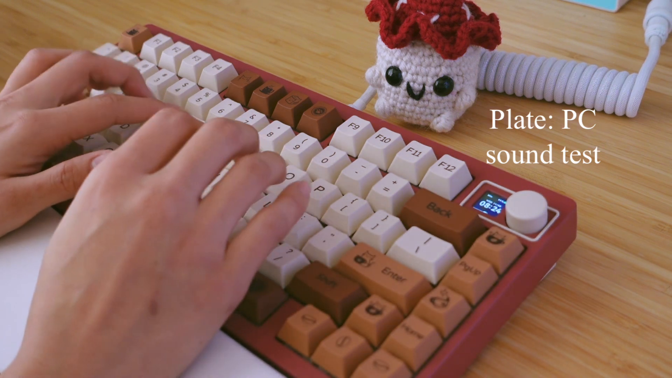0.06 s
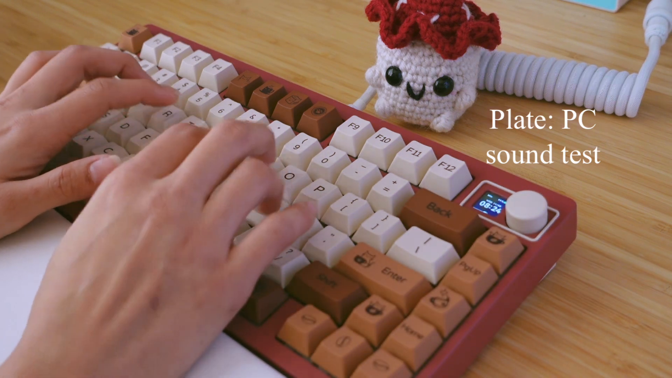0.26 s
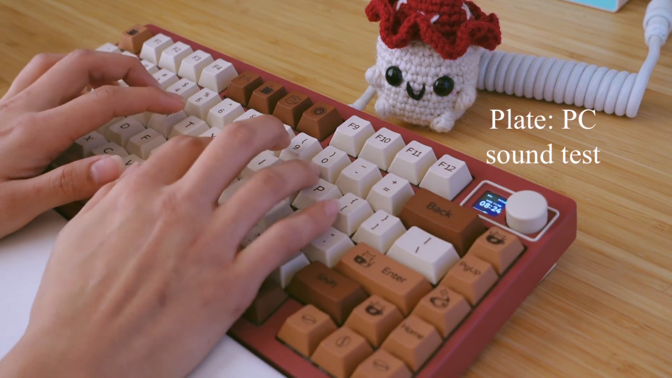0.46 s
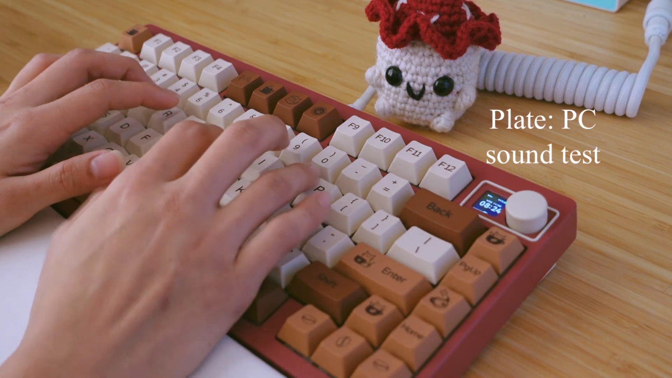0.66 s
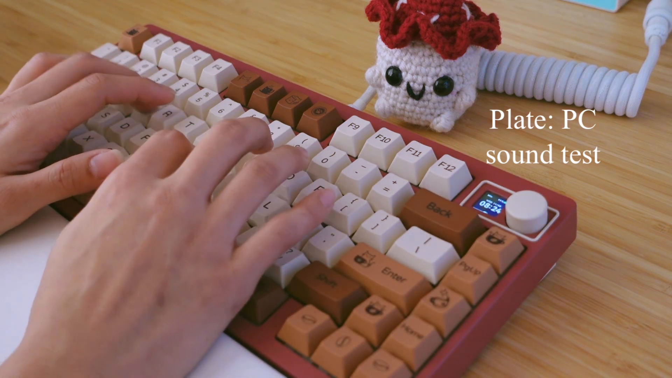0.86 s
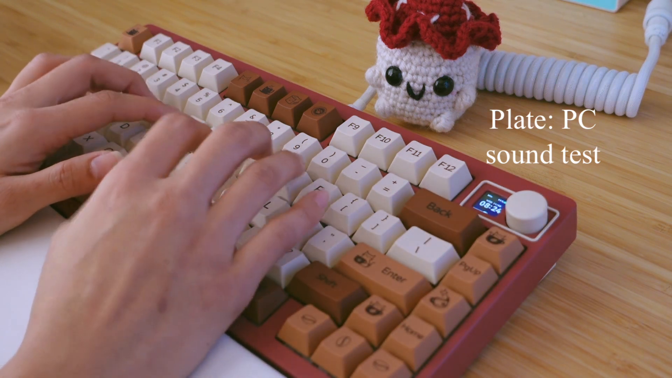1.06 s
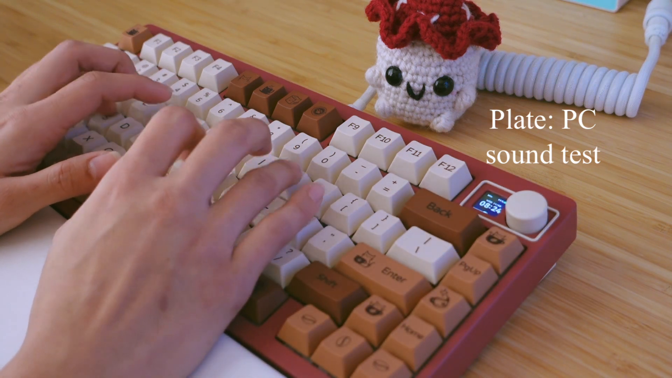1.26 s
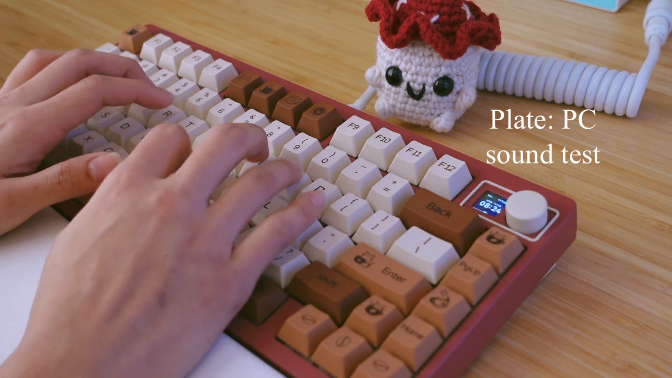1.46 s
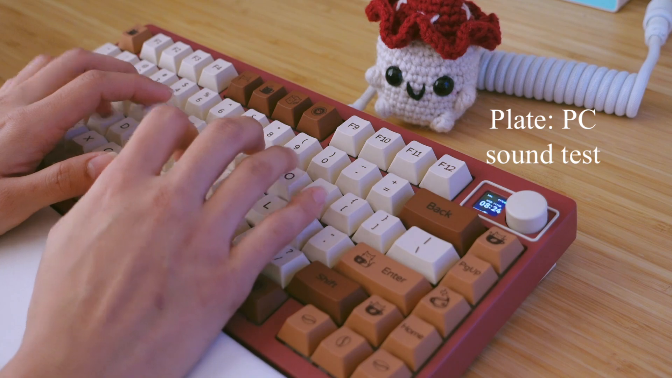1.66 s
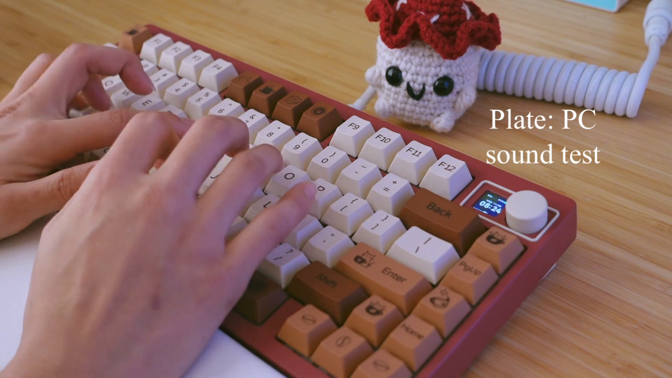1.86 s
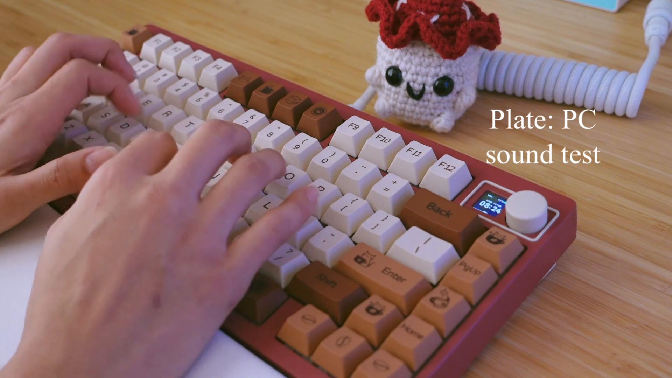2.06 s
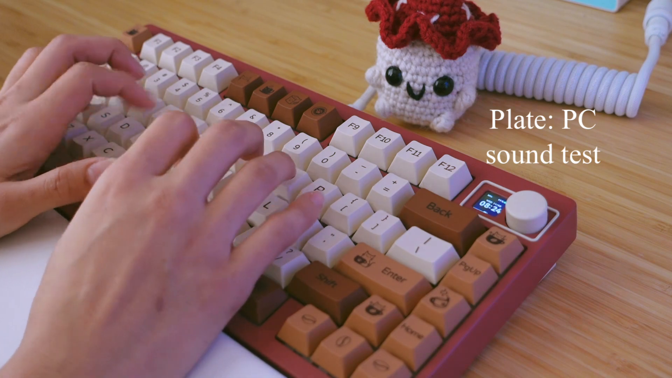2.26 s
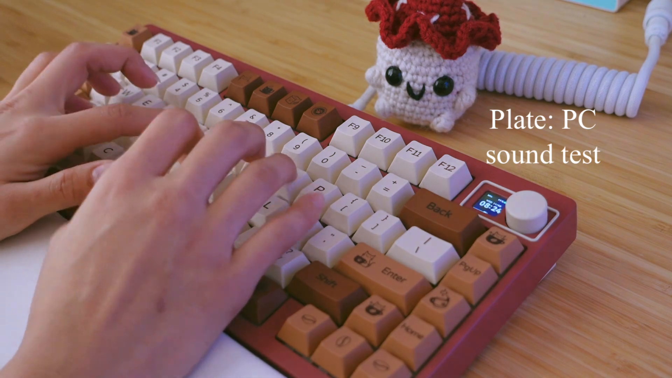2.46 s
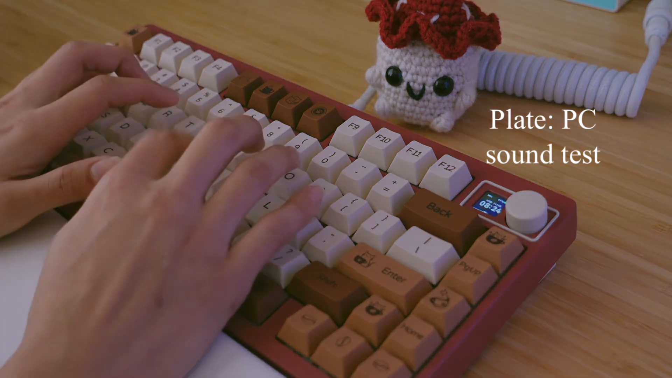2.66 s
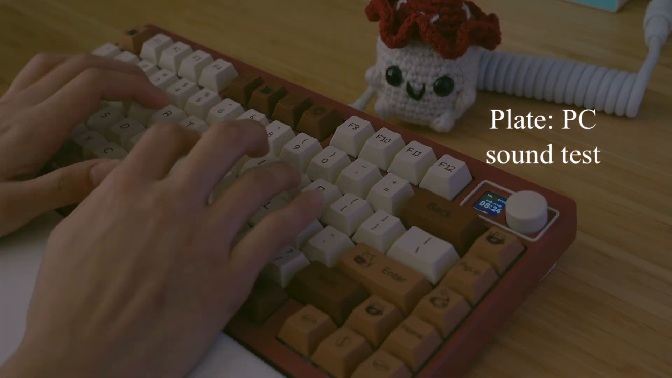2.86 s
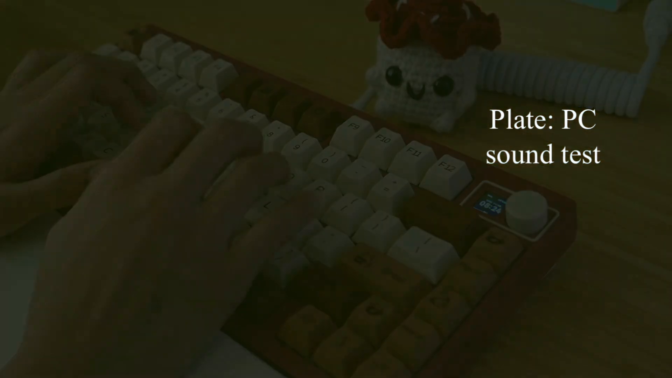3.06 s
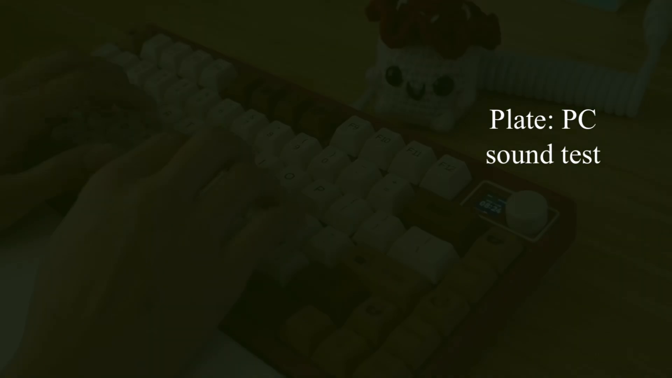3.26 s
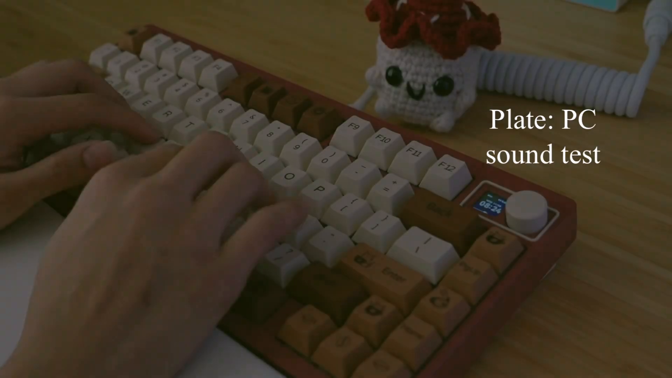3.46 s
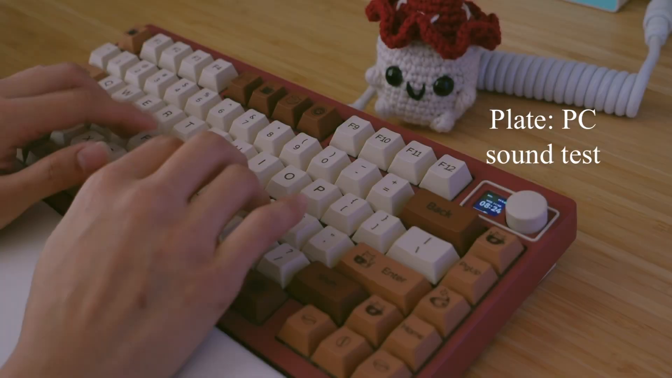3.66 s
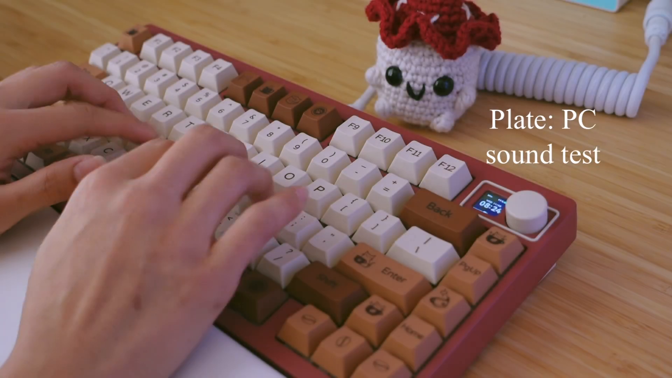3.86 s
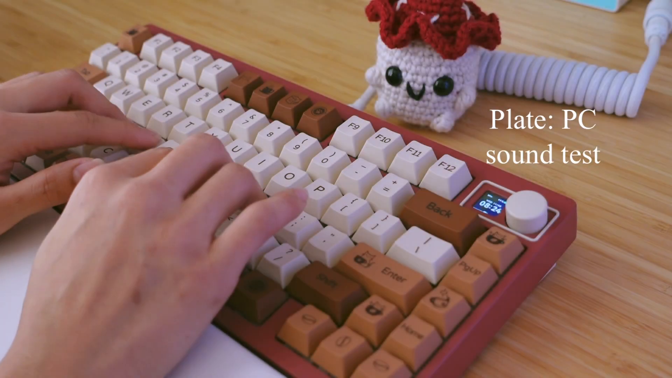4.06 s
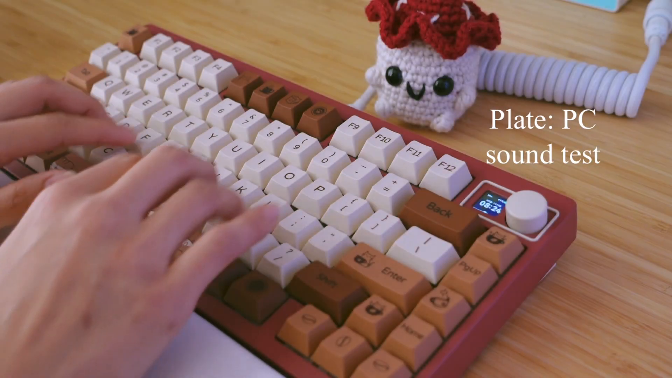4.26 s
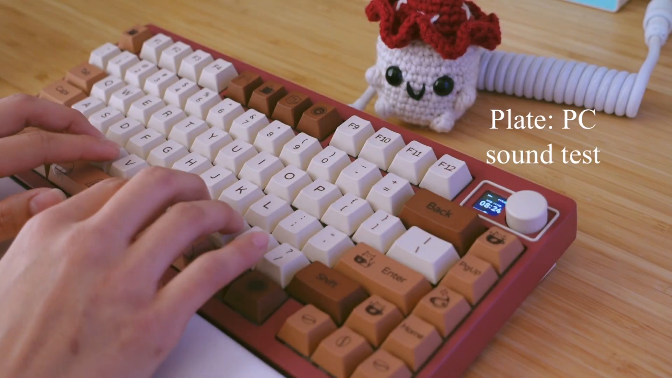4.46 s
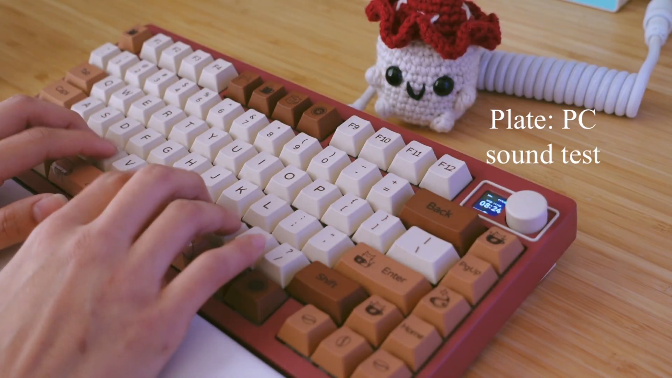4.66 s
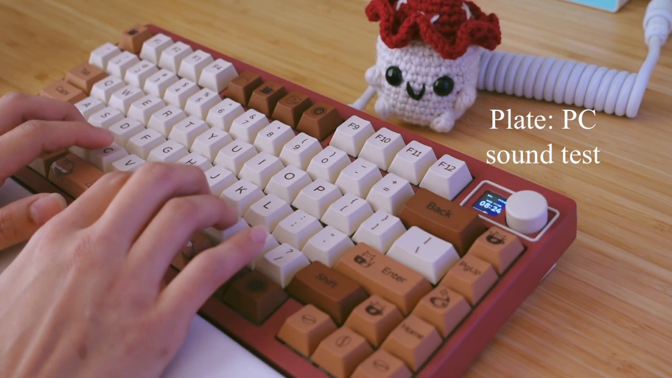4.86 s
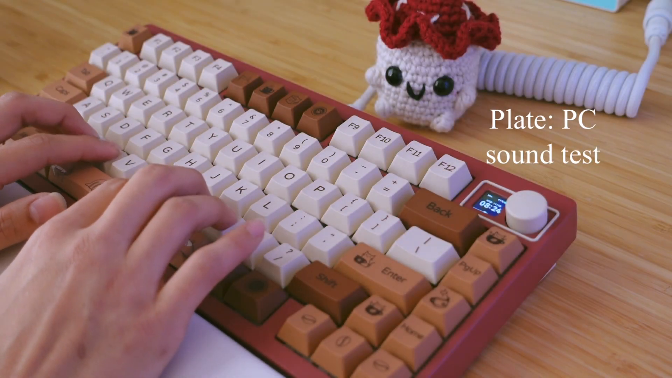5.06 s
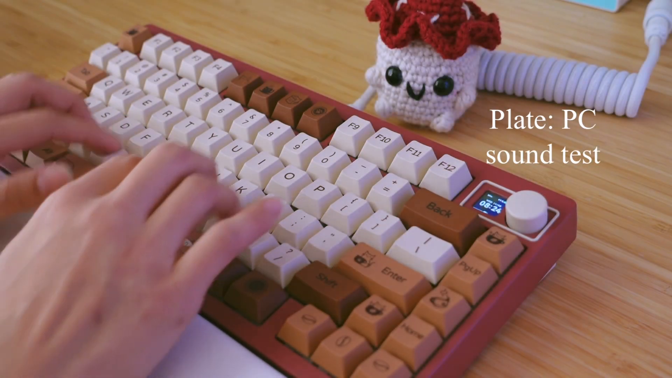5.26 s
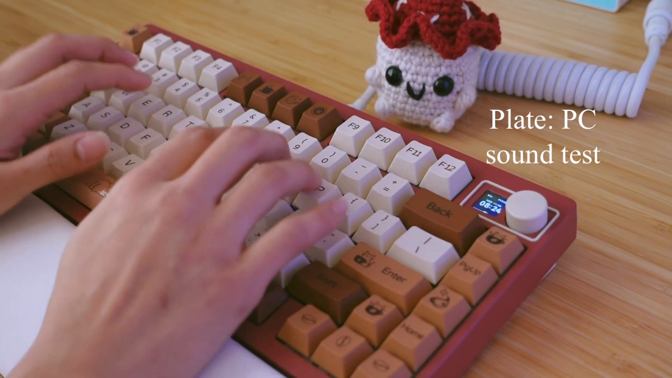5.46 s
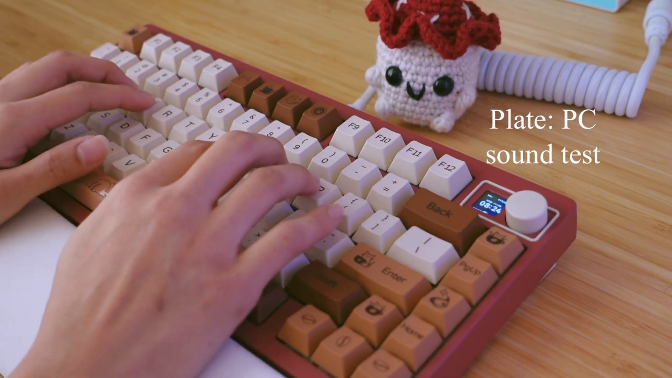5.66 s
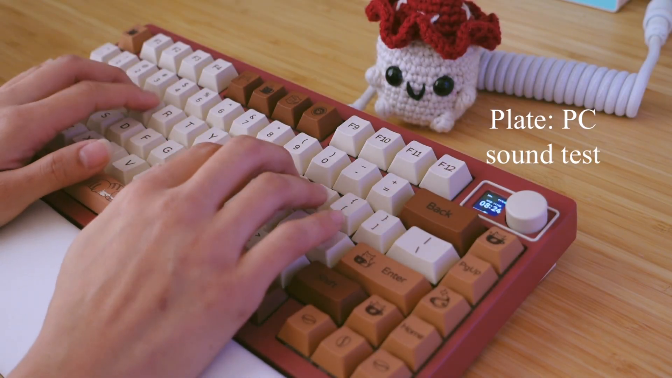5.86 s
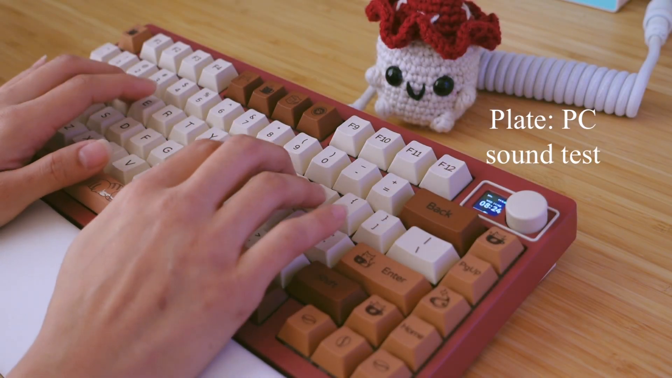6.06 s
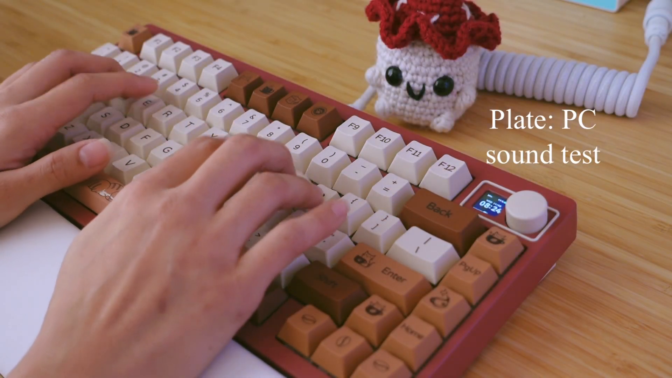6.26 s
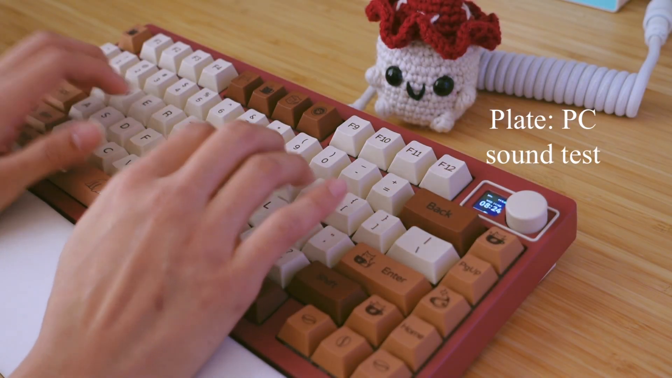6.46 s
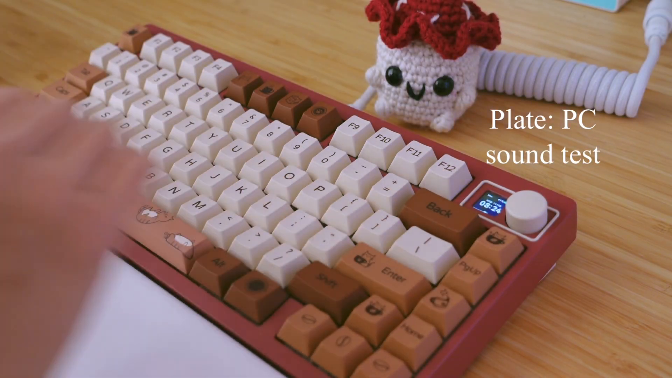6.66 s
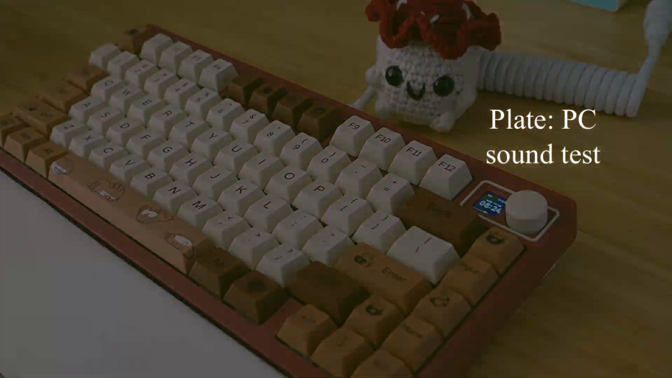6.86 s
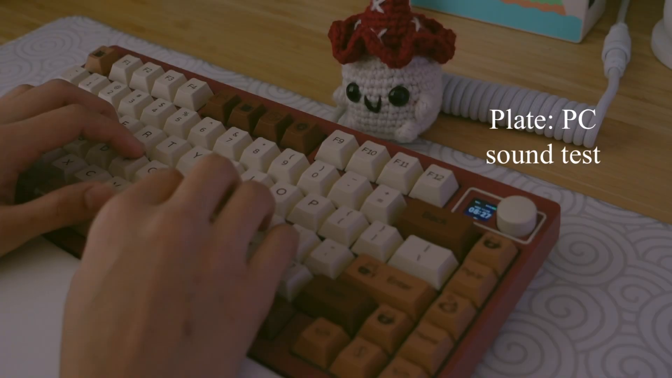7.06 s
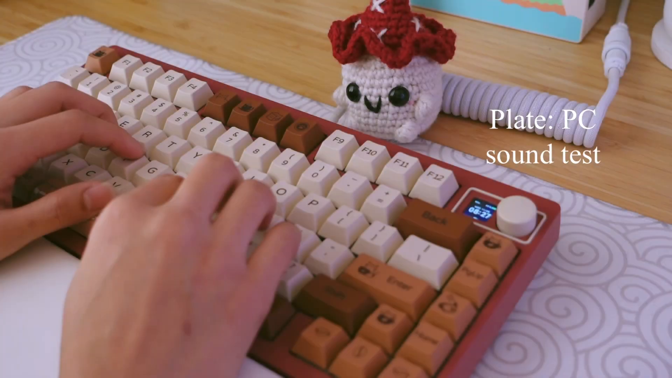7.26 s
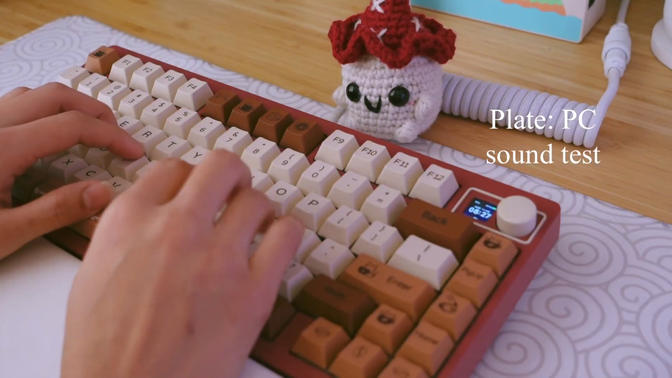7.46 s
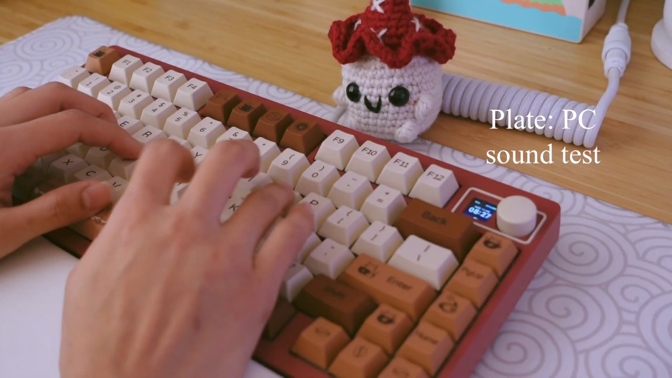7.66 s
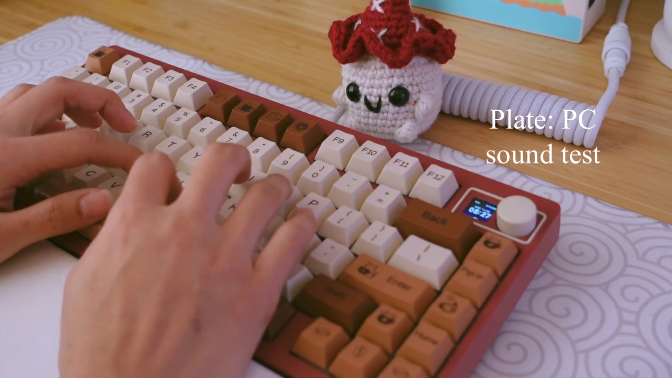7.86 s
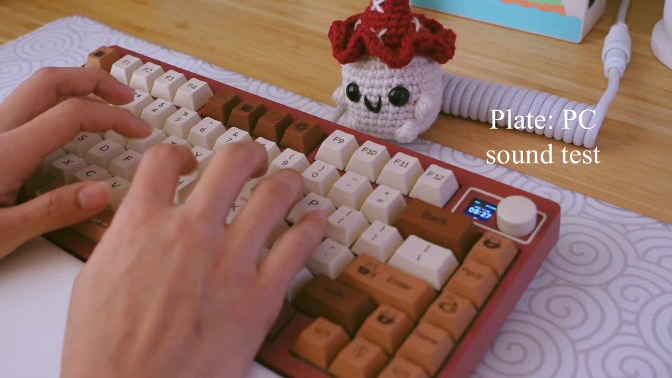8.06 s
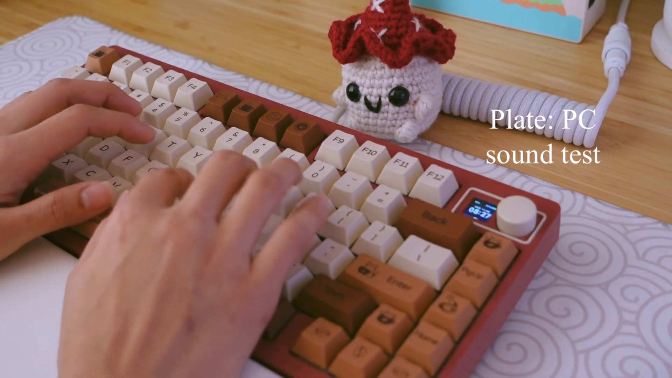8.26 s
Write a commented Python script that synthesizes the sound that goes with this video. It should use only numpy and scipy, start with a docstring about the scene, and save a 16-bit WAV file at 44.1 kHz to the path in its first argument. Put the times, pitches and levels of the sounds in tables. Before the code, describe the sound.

A mechanical keyboard is typed on quickly, heard close up on a wooden desk in a small, fairly dry room. Soft fan air and a thin high whine run from the start. From 0 to 2.9 s firm, bright plastic clacks come about ten or more a second, with a lull around 0.3-0.7 s, crisp switch snaps, short case ringing, low desk thumps and a few hollow strokes. After a short gap, lighter, denser clatter runs from 3.4 to 4.2 s with a springy high zing. Another tight burst, with more knock from the plate, fills 4.7-5.3 s. A strong, rapid flurry follows at 5.8-6.5 s, then faint finger brushes and a pause. Near 7 s the fan and whine drop. From 7.5 to 8.3 s steadier, sparser strokes clack on a soft mat, with much less thump and a clear spring zing.

```python
"""Runs of quick typing on a mechanical keyboard with a plastic plate, a microphone close by on the wooden desk.
A soft fan and a faint whine are there from the start; the whine weakens and the fan sinks late on.
Each press and release clacks a keycap, knocks the plate, shakes the case, snaps the switch and thumps the desk.
A small room answers the clacks, fingertips brush the caps, some strokes land hollow; the last run is on a soft mat.
Struck parts are damped modes and shaped noise; fan, whine and brushes are filtered noise."""
import sys
import numpy as np
from scipy import signal
from scipy.fft import rfft, irfft, next_fast_len
from scipy.io import wavfile

SR = 44100
rng = np.random.default_rng(int(sys.argv[2]) if len(sys.argv) > 2 else 0)


def dump(signal):
    """Clip the signal to [-1, 1] and save it as 16-bit WAV at the path in sys.argv[1]."""
    limited = np.clip(np.atleast_2d(signal).T, -1, 1)
    pcm = np.round(limited * 32767).astype(np.int16)
    wavfile.write(sys.argv[1], SR, pcm)


N = 366910
T = np.arange(SR // 6) / SR  # time within one stroke, s

# Runs of typing, the last on a soft mat. Each row: start in seconds, end in seconds, lift of the snap in dB,
# lift of the thump in dB, spring zing against the snap in dB, plate tuning as a ratio.
RUNS = [(.05, 2.93, 2.5, 1.5, -10.5, 1.05), (3.359, 4.28, -1, 0.5, 1, 0.96), (4.67, 5.33, -2, -3, -8, 0.95),
        (5.831, 6.5, 0.5, 1, -13, 0.996), (7.5, 8.3, 0.5, -10, -1, 0.93)]


def amp(db):
    """Decibels to gain."""
    return 10 ** (np.asarray(db) / 20)


def unit(x):
    """Scale to rms 1."""
    return x / np.sqrt(np.mean(x ** 2) + 1e-20)


def over(x, span):
    """Scale a short sound so that its energy, spread over span seconds, has rms 1."""
    return x * np.sqrt(span * SR / (np.sum(x ** 2) + 1e-20))


def along(points, hz):
    """Read (Hz, value) points on a log frequency axis."""
    f, v = np.transpose(points)
    return np.interp(np.log(hz + 1), np.log(f + 1), v)


def filtered(x, response):
    """Multiply the spectrum of x by a response of frequency."""
    n = x.shape[-1]
    padded = next_fast_len(n + 4096)
    spectrum = rfft(x, padded) * response(np.fft.rfftfreq(padded, 1 / SR))
    return irfft(spectrum, padded)[..., :n]


def noise(spectrum, shape):
    """Noise coloured by (Hz, dB) points."""
    return filtered(rng.standard_normal(shape), lambda hz: amp(along(spectrum, hz)))


def resonance(centre_hz, width_hz):
    """Noise through one resonance, as long as the whole scene."""
    return filtered(rng.standard_normal(N), lambda hz: bump(hz, centre_hz, width_hz))


def bump(hz, centre, width):
    """Gain of one resonance: 1 at its centre, half at one width to either side."""
    return 1 / (1 + ((hz - centre) / width) ** 2)


def highpass(x, corner_hz, order):
    """Weaken what lies below a corner frequency."""
    return signal.sosfilt(signal.butter(order, corner_hz, "highpass", fs=SR, output="sos"), x)


def wobble(t, rate):
    """A random curve over times t, rate knots a second."""
    knots = rng.standard_normal(int(rate * t[-1]) + 2)
    return np.interp(t * rate, np.arange(len(knots)), knots)


def clatter(spread_db, rate):
    """Uneven strength of loose parts chattering, rate random levels a second."""
    return amp(spread_db * wobble(T, rate))


def fade(attack, t60):
    """Envelope of a struck thing: a rise, then a decay of 60 dB in t60 seconds."""
    return (1 - np.exp(-T / attack)) * amp(-60 * T / t60)


def ring(modes, pitch, attack, scatter_db):
    """Damped modes, struck at new random strengths each time."""
    total = np.zeros(len(T))
    for f, db, t60 in modes:
        strength = amp(db + scatter_db * rng.normal())
        total += strength * np.sin(2 * np.pi * f * pitch * T) * fade(attack, t60)
    return total


def pan(db):
    """Left and right gains for a level difference, positive to the left."""
    return amp(np.array([[.5], [-.5]]) * db)


def add(track, s, sound):
    """Mix a sound into a track at time s."""
    part = track[..., max(0, round(s * SR)):][..., :len(T)]
    part += sound[..., :part.shape[-1]]


def run_at(s):
    """Snap lift, thump lift, zing and plate tuning of the run of typing around or nearest to time s."""
    return min(RUNS, key=lambda run: max(run[0] - s, s - run[1]))[2:]


def fan():
    """Soft moving air with a few narrow resonances, wavering in level together."""
    # Fan and room air. Each row: frequency in Hz, relative level in dB per Hz.
    air_spectrum = [(20, -46), (45, -45), (75, -11), (98, -17), (120, -2), (170, -1.5), (250, -1),
                    (370, -7.5), (520, -7.5), (900, -13.5), (1800, -15.5), (3200, -25), (5500, -34),
                    (16000, -44)]
    # Left-right likeness of the air. Each row: frequency in Hz, coherence from 0 to 1.
    alike = [(60, 0.93), (180, 0.96), (550, 0.78), (1650, 0.66), (4970, 0.56), (15000, 0.79)]
    # Narrow resonances. Each row: frequency in Hz, width in Hz, rms in dB before the slow level changes.
    resonances = [(215.6, 11.9, -48.5), (314.4, 11.8, -54.5), (431, 12.5, -63.5), (993, 2.8, -71.5)]
    # The background sinks a little toward the end. Each row: time in seconds, gain in dB.
    slow_level = [(6.3, 0.52), (7.0, -0.86)]

    def mid_side_gains(hz):
        angle = np.arccos(np.clip(along(alike, hz), -1, 1)) / 2
        return np.array([np.cos(angle), np.sin(angle)])

    mid, side = filtered(noise(air_spectrum, (2, N)), mid_side_gains)
    air = amp(-48) * unit(np.array([mid + side, mid - side]))
    hum = sum(amp(db) * unit(resonance(f, width)) for f, width, db in resonances)
    t = np.arange(N) / SR
    waver_db = 1.4 * wobble(t, rate=14)
    return amp(np.interp(t, *np.transpose(slow_level)) + waver_db) * (air + hum)


def whine():
    """A thin, fuzzy electrical whine: narrow noise that weakens late on."""
    # Steady before the first row and after the last. Each row: time in seconds, rms level in dB.
    whine_level = [(6.8, -72.5), (7.1, -80)]
    level_db = np.interp(np.arange(N) / SR, *np.transpose(whine_level))
    return amp(level_db) * unit(resonance(4370, 83))


def keys():
    """Every contact clacks the cap and knocks the plate; case, switch and desk follow its strength."""
    # Presses and releases. Each row: time in seconds, strength as rms of the cap in dB,
    # cap pitch in Hz, plate knock in dB.
    contacts = [(0.064, -20.5, 2560, -45), (0.1184, -23.5, 2710, -56), (0.1713, -24, 1930, -36),
                (0.2251, -20.5, 2630, -42), (0.2907, -40, 2040.0, -41), (0.301, -29, 2470, -36.5),
                (0.4497, -43.5, 2360.0, -50), (0.587, -32.5, 2800, -39), (0.682, -49, 2320, -43),
                (0.7475, -29.5, 2340, -38), (0.8353, -24.5, 2550, -56), (0.9086, -24, 2700, -45.0),
                (0.9327, -36, 2210, -44), (0.977, -21, 2600, -39), (1.0781, -25.5, 2600, -48),
                (1.1333, -46, 2140.0, -42), (1.157, -26.5, 2530, -35.5), (1.3338, -20, 2620.0, -36.5),
                (1.398, -56, 2580, -40), (1.4233, -19.0, 2690, -32.5), (1.5252, -28, 2320, -37),
                (1.556, -34.5, 1720, -36), (1.5861, -20.5, 2880, -32), (1.6854, -43.0, 2510.0, -40),
                (1.7278, -19, 2580, -33), (1.8502, -20.5, 2430.0, -36), (1.9235, -18, 2100, -26),
                (1.98, -39, 2400.0, -42), (2.031, -19, 2720.0, -36), (2.0685, -38, 1760.0, -43),
                (2.148, -39, 2040, -34), (2.1764, -36.5, 2750, -58.0), (2.2502, -22.0, 2270, -36.0),
                (2.3406, -20.5, 2160, -35), (2.456, -22.5, 2420, -38), (2.5324, -44, 1700.0, -37),
                (2.5479, -24, 2360, -31.0), (2.6628, -22.5, 3000, -33), (2.7587, -25.5, 2600, -51.0),
                (2.8027, -17, 2520, -37), (2.8762, -32.5, 2380, -39), (2.9336, -21, 2830, -38),
                (3.0889, -50, 2490.0, -44), (3.3694, -25, 2750, -44), (3.4059, -26, 1720, -46),
                (3.427, -21, 2530, -42), (3.469, -32, 2590.0, -54.0), (3.4913, -23.5, 2610, -63),
                (3.5246, -42, 1700.0, -41.5), (3.5322, -33, 2520, -37.5), (3.543, -33, 2260, -39),
                (3.6132, -38, 2420, -44), (3.6913, -31, 2100, -37.0), (3.6943, -22.5, 2800, -52),
                (3.7031, -24, 2720.0, -40), (3.739, -27.5, 2650, -46), (3.7681, -30.5, 2510, -51),
                (3.775, -24, 2500, -52.0), (3.8451, -33.5, 2200.0, -40), (3.86, -36, 2480, -36),
                (3.8991, -40.5, 2260, -50), (3.9137, -40.5, 2280, -50), (4.0077, -26.5, 2820, -39),
                (4.047, -26.0, 2590, -47), (4.073, -26.5, 2520, -52.0), (4.1155, -35, 2530, -60.5),
                (4.1674, -37, 2300, -40), (4.187, -33, 2230, -52), (4.193, -33, 1670.0, -44),
                (4.227, -42, 2300, -41), (4.6808, -23.5, 2620, -31), (4.6938, -31, 1980.0, -39.0),
                (4.7224, -22.5, 2620, -26), (4.758, -23.5, 2360, -29.5), (4.8069, -49, 1750.0, -36),
                (4.8196, -38.5, 1870.0, -51), (4.832, -53, 1900.0, -38), (4.8766, -50, 1680.0, -35),
                (4.8816, -35, 2240, -35), (4.921, -29, 1850, -47), (4.9432, -24, 2670, -34),
                (4.9734, -28.5, 2690, -44.0), (4.9863, -28, 2500, -30.5), (5.0172, -22.5, 2640, -35),
                (5.0785, -25.5, 2400, -31), (5.1014, -42, 1940, -40), (5.136, -49, 1690.0, -36),
                (5.2061, -27.0, 2580.0, -35.5), (5.256, -29, 2700, -35), (5.286, -51, 1830.0, -38),
                (5.292, -41, 1850.0, -30), (5.3014, -47, 2180.0, -32), (5.3121, -31, 2120, -31),
                (5.8306, -18.5, 2350, -31.0), (5.8574, -23.5, 2620, -41.0), (5.87, -28, 2760.0, -36),
                (5.9075, -20, 2630, -36.5), (5.9261, -23.5, 2560, -42), (5.9665, -45, 1870, -38),
                (6.0295, -46, 1950.0, -42.5), (6.0504, -46, 2370, -44), (6.0729, -21.5, 2730, -33.5),
                (6.0842, -16.5, 2470, -36), (6.117, -35, 2640.0, -40.0), (6.1292, -22, 2570, -37),
                (6.1652, -24, 2550, -47), (6.1936, -40, 2210.0, -37), (6.2118, -40.0, 2000, -40.5),
                (6.2449, -41, 2440.0, -44), (6.3056, -22.5, 2730, -34), (6.324, -22, 2560, -38),
                (6.3269, -20.5, 2380, -36.0), (6.3411, -22.5, 2600, -30), (6.3512, -15.5, 2580, -35.0),
                (6.3706, -24.5, 2640.0, -44.0), (6.4571, -42, 1910, -30), (6.466, -28.5, 2190.0, -38),
                (6.4779, -30.5, 2535, -38), (7.5097, -24.5, 2480.0, -56), (7.5855, -21.5, 2168, -53),
                (7.6878, -16.5, 2490, -47), (7.7884, -44, 2300, -61), (7.823, -20, 2600, -36),
                (7.9023, -34, 2300.0, -43), (7.9149, -27, 2330, -56), (7.946, -30, 2030, -33),
                (8.0159, -40, 2182, -32.0), (8.0245, -19.5, 2170.0, -42), (8.1447, -26, 2950, -34),
                (8.2034, -21.5, 2450, -64), (8.2706, -23, 2440, -40)]
    firm_db = -20  # strength of a firm stroke
    # what a firm stroke excites, and the dB that this gains per dB of strength
    case_db, case_grows = -32.5, 0.92
    snap_db, snap_grows = -41, 1
    thump_db, thump_grows = -45, 0.31
    snap_db_per_octave = 7.5  # a higher, harder contact snaps more
    clacks, thumps = np.zeros((2, N)), np.zeros(N)
    for s, db, cap_hz, plate_db in contacts:
        snap_lift, thump_lift, zing_db, tuning = run_at(s)
        force_db = db - firm_db
        hardness_db = snap_db_per_octave * np.log2(cap_hz / 2500)
        cap = amp(db) * cap_clack(cap_hz, attack=.0002, scatter_db=1.5, span=.003)
        plate = amp(plate_db) * plate_knock(tuning)
        case = amp(case_db + case_grows * force_db) * case_ring()
        switch = amp(snap_db + snap_grows * force_db + hardness_db + snap_lift) * snap(zing_db)
        place = pan(1.1 * rng.normal())
        add(clacks, s, place * (pan(-0.9) * (cap + case) + pan(-2.5) * plate + pan(1.0) * switch))
        add(thumps, s, amp(thump_db + thump_grows * force_db + thump_lift) * desk_thump())
    # the desk top is too small to radiate the deepest bass
    return clacks, highpass(thumps, 66.5, order=6)


def cap_clack(pitch_hz, attack, scatter_db, span):
    """A keycap rings on its stem in short damped modes, one of them faint and lingering."""
    # Each row: multiple of the cap pitch, relative level in dB, t60 in seconds.
    cap_modes = [(1, 26.5, 0.004), (1.02, -9, .026), (1.3, 8, 0.0043), (1.7, -22, 0.0059)]
    return over(ring(cap_modes, pitch_hz, attack, scatter_db), span)


def plate_knock(tuning):
    """Short modes of new random strength and slight detuning each time, weak below the first mode."""
    # Modes of the plate. Each row: frequency in Hz before tuning, relative level in dB, t60 in seconds.
    plate_modes = [(1248, -5, 0.022), (1456, 5.5, 0.0092), (1780, -9.5, 0.017)]
    bend = ring(plate_modes, tuning + 0.026 * rng.normal(), attack=0.00026, scatter_db=9.0)
    return over(highpass(bend, 1080, order=3), 0.0059)


def case_ring():
    """The case rings in many close modes, a few of which stand out."""
    # Dense ringing of the case and the neighbouring keys. Each row: frequency in Hz, relative dB per Hz.
    dense_spectrum = [(300, -38), (980, -31), (1300, -11.5), (2000, -1.5), (2650, 3.5), (3300, -9.5),
                      (4200, -14.5), (5200, -19), (6800, -34), (16000, -39)]
    # Strongest modes. Each row: frequency in Hz before a small random detuning, relative dB, t60 in seconds.
    strong_modes = [(1313, -14, 0.064), (1503, -3, 0.07), (2005, -7, 0.11), (2144, -2, 0.079),
                    (2530, 5, 0.078), (2730, -6, 0.024), (3187, -0.5, .04), (4080, -8.5, 0.054),
                    (4950, -15, .04)]
    grain = unit(noise(dense_spectrum, len(T)) * fade(0.00026, 0.038) * clatter(spread_db=2.5, rate=540))
    modes = unit(ring(strong_modes, 1 + 0.01 * rng.normal(), attack=0.0012, scatter_db=6.5))
    return over(grain + amp(-6.5) * modes, 0.013)


def snap(zing_db):
    """A sharp snap of the stem; a fine rattle and a high zing of the spring start at once and last longer."""
    # Plastic snap inside the switch. Each row: frequency in Hz, relative level in dB per Hz.
    snap_spectrum = [(1500, 0), (3500, 9), (5000, 7.5), (6800, -6.5), (9000, 0), (10400, -3), (12500, -9.5),
                     (16000, -27)]
    rattle = amp(-16) * fade(0.00078, 0.052) * clatter(spread_db=2.5, rate=670)
    stem = unit(noise(snap_spectrum, len(T)) * (fade(.00005, 0.003) + rattle))
    spring = filtered(rng.standard_normal(len(T)), lambda hz: bump(hz, centre=10580, width=750))
    zing = unit(spring * fade(.0002, t60=0.015))
    return over(stem, 0.0061) + amp(zing_db) * over(zing, 0.0022)


def desk_thump():
    """The wooden desk answers with a short burst of low noise."""
    # Thump of the desk. Each row: frequency in Hz, relative level in dB per Hz.
    desk_spectrum = [(30, -60), (70, -31), (105, -7.5), (135, 13.5), (190, -7.5), (240, 5), (330, -7.5),
                     (550, -14), (900, -10), (2000, -39)]
    return over(noise(desk_spectrum, len(T)) * fade(0.0038, 0.091), 0.023)


def fingers(tick_db, spread_db):
    """Fingertips brush the caps (noise) and nudge loose ones into faint ticks at random times in each run."""
    # Brushes over the caps. Each row: time in seconds, level in dB, length in seconds, centre in Hz.
    brushes = [(0.564, -57, 0.018, 3000), (1.396, -47, 0.011, 8900), (1.703, -43.5, 0.0084, 4940),
               (3.633, -46.5, 0.028, 3200), (4.178, -47.5, 0.046, 3500), (6.556, -53.5, 0.048, 3960),
               (6.611, -42.5, 0.013, 3600), (7.0, -51, 0.0062, 7800)]
    # Skin on plastic. Each row: frequency in Hz, relative level in dB per Hz.
    skin_spectrum = [(1000, 6), (3000, 1), (5000, -8), (7500, -1.5), (10000, -11), (13000, -10),
                     (16000, -18)]
    track = np.zeros(N)
    for s, db, length, centre_hz in brushes:
        skin = filtered(noise(skin_spectrum, len(T)), lambda hz: 1 + amp(5) * bump(hz, centre_hz, 1300))
        add(track, s, amp(db) * over(skin * fade(length / 2, 4 * length), length))
    for start, end, *_ in RUNS:
        for s in rng.uniform(start, end, int(18 * (end - start))):  # 18 ticks a second
            cap = cap_clack(rng.uniform(880, 3000), attack=0.00016, scatter_db=4, span=0.011)
            level_db = tick_db + spread_db * (rng.random() + 0.5)
            add(track, s, amp(level_db) * (cap + case_ring()))
    return track


def switch_ticks():
    """A switch ticks on its own as its stem starts to move: the snap alone."""
    # Each row: time in seconds, level in dB.
    ticks = [(0.0928, -39), (0.882, -44), (1.2261, -46.5), (1.398, -45), (1.555, -51), (1.7056, -57),
             (2.006, -39.5), (2.13, -46.5), (2.65, -52.5), (3.393, -45), (4.187, -48), (4.2097, -48),
             (6.4576, -41), (6.6146, -45.5), (7.4977, -43)]
    track = np.zeros((2, N))
    for s, db in ticks:
        add(track, s, amp(db) * pan(1.0) * snap(zing_db=-13.5))
    return track


def room(x, tail_db):
    """Things on the desk and near walls throw back quick copies, along with a short diffuse tail."""
    # Room decay. Each row: frequency in Hz, t60 in seconds.
    decay = [(200, 0.13), (1200, 0.29), (2600, 0.18), (6000, 0.32), (11000, 0.37)]
    # Echoes from the desk and near walls. Each row: delay in seconds before a small jitter, level in dB.
    echoes = [(.0057, -20), (.0079, -22), (0.0095, -18), (.0199, -29), (.0244, -26.5)]
    wet = np.zeros((2, N + len(T)))
    for start in range(0, N, len(T)):  # a fresh random set of echoes and tail for each block of time
        hz, t, z = signal.stft(rng.standard_normal((2, len(T))), SR, nperseg=256)
        decaying = z * amp(-60 * t / along(decay, hz)[:, None])
        tail = signal.istft(decaying, SR, nperseg=256)[1][:, :len(T)]
        tail = tail * (1 - np.exp(-(T / 0.0015) ** 2))  # soft start
        mid, side = amp(tail_db) * tail / np.linalg.norm(tail[0])
        for delay, db in echoes:
            at = round(abs(delay + .00025 * rng.normal()) * SR)
            mid[at] += amp(db)
            side[at] += amp(db) * rng.normal()
        paths = np.array([mid + 0.5 * side, mid - 0.5 * side])
        answer = signal.fftconvolve(x[None, start:start + len(T)], paths, axes=1)
        wet[:, start:start + answer.shape[1]] += answer
    return wet[:, :N]


def knocks():
    """A heavy finger sounds the hollow of the housing, at a pitch set for each stroke."""
    # Hollow knocks. Each row: time in seconds, level in dB before a 9 dB cut, pitch of the hollow in Hz.
    heavy_strokes = [(0.746, -32.5, 566), (1.156, -30, 382), (1.523, -31.5, 668), (1.553, -38.5, 1070),
                     (2.251, -29, 550), (2.549, -29.5, 564), (2.665, -35.5, 424), (5.246, -28.5, 476),
                     (5.29, -37, 880), (5.516, -33.5, 900), (7.945, -39, 800), (8.024, -42, 800)]
    # Hollow of the housing. Each row: frequency in Hz, relative level in dB per Hz.
    hollow_spectrum = [(120, -42), (300, 7), (430, -7), (570, 0.5), (750, -1.5), (950, -21), (1200, 0.5),
                       (2200, -30), (6000, -70)]
    track = np.zeros(N)
    for s, db, pitch_hz in heavy_strokes:
        hollow = filtered(noise(hollow_spectrum, len(T)), lambda hz: 1 + amp(8) * bump(hz, pitch_hz, 206))
        add(track, s, amp(db - 9.0) * over(hollow * fade(0.0043, 0.082), 0.019))
    return highpass(track, 130, order=2)


def scene():
    """The keyboard in its room; the low sounds lean a little to the right."""
    clacks, thumps = keys()
    clacks = clacks + switch_ticks() + fingers(tick_db=-61.0, spread_db=8.5)
    clacks = highpass(clacks, 83, order=2)  # the clacks carry little below about 80 Hz
    low = (thumps + knocks() + fan()) * pan(-2.17)
    return clacks + room(clacks.mean(axis=0), tail_db=-11.0) + low + whine()


def record(dry):
    """The recorder keeps nothing above its band limit of 15.9 kHz."""
    return filtered(dry, lambda hz: hz < 15900)


dry = scene()
out = record(dry)
dump(out)
```